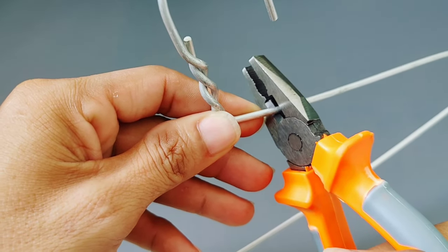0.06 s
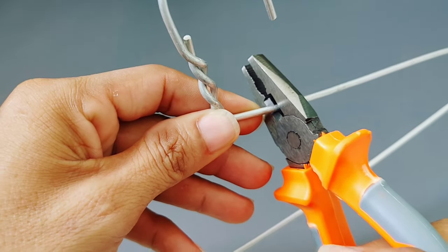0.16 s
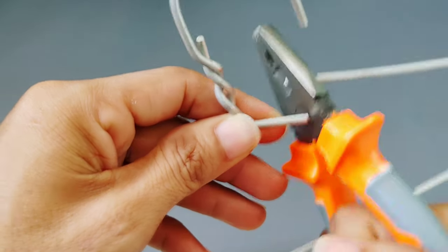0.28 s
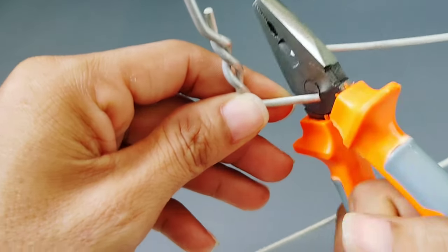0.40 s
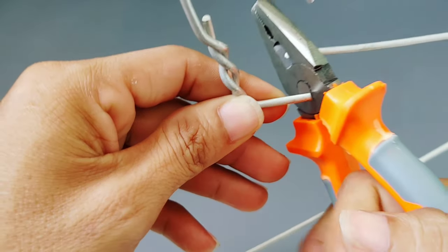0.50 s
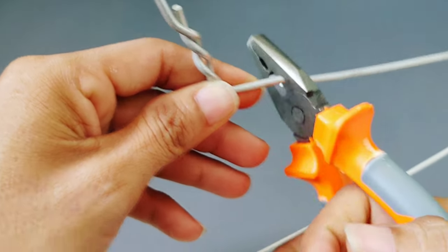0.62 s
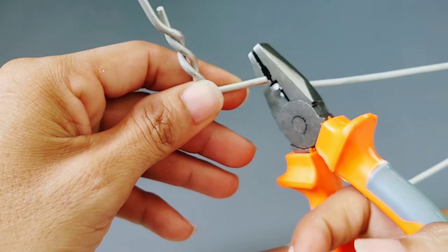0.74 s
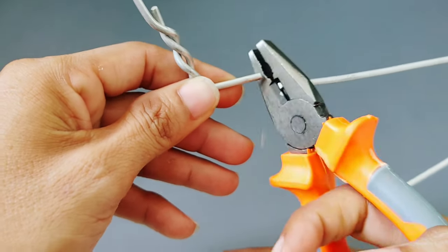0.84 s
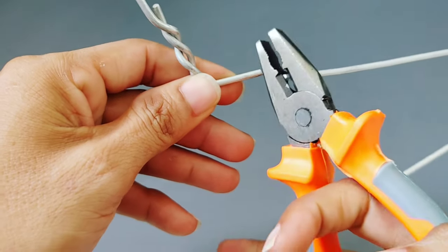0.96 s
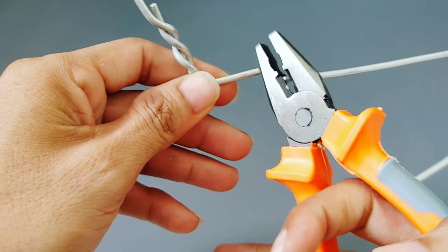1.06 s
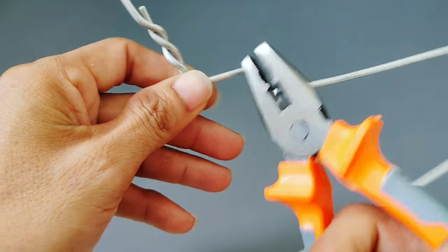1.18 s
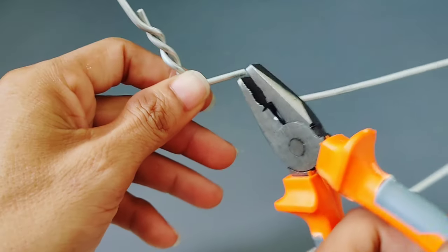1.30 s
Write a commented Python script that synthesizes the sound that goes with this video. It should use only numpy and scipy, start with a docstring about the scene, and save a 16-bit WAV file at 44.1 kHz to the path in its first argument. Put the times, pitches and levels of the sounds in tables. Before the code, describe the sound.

Steel pliers cut a wire with one loud, sharp snap and short metallic rattle, then faint hand rustle and scattered bright clicks and scrapes, heard very close in stereo in a quiet, hard indoor room.

```python
"""Steel pliers bite and snap through a wire close to a two-port microphone in a quiet, hard room.
The jaws clack and the steel rings as sums of decaying modes; the cut wire rattles as dense coloured grains.
A modal thump runs through the handles. Ticks are noise bursts with damped steel modes; the bite before
the snap and the scrapes after it are streams of tiny slips. Sparse random taps give the room's tail;
drifting noise gives its hush, and a faint coloured hiss the rustle of the hands."""
import sys
import numpy as np
from scipy import signal
from scipy.fft import rfft, irfft
from scipy.io import wavfile
from scipy.ndimage import uniform_filter1d

SR = 44100
rng = np.random.default_rng(int(sys.argv[2]) if len(sys.argv) > 2 else 0)


def volts(x):
    """Linear amplitude factor 10**(x/20) for a level x in dB, scalar or array-like."""
    e = np.asarray(x, float) / 20
    return 10 ** e


def generate_wav(sig):
    """Save sig (samples, or channels by samples) to the path in sys.argv[1] as 16-bit PCM at SR."""
    pcm = np.round(np.clip(np.atleast_2d(sig).T, -1, 1) * 32767).astype(np.int16)
    wavfile.write(sys.argv[1], SR, pcm)


N = 59535  # samples
SNAP_S = 0.2057
SLIPS_PER_S = 8100  # in each grain stream of the bite, scrapes and rustle

# Free vibration modes of pliers and wire: pitch_hz, relative_level_db, free_t60_s
STEEL_MODES = [(2293, -8, .25), (3560, -10, .25), (4032, -8, .22), (4830, -10, .15), (5270, -10, .15),
               (5701, -5, .25), (6030, -8, .2), (7058, -10, .18), (8804, -4, .13), (9636, -4, .12),
               (10523, -6, .13), (11080, -5, .13), (11572, 0, .2), (12280, -6, .18), (12990, -5, .13),
               (14070, -6, .12), (15300, -4, .11)]


def evened(x):
    """Normalization to unit root-mean-square level over both ports together."""
    return x / np.sqrt(np.mean(x ** 2) + 1e-20)


def read(points, hz):
    """Interpolation of a spectral curve along a logarithmic frequency axis."""
    f, value = np.transpose(points)
    return np.interp(np.log(hz + 1), np.log(f + 1), value)


def add(mix, start_s, sound):
    """Linear superposition of a sound onto the mix, cut at its end."""
    part = mix[:, round(start_s * SR):][:, :sound.shape[-1]]
    part += sound[..., :part.shape[1]]


def pan(left_minus_right_db):
    """Level difference between the ports, shared equally as gain and loss."""
    half_db = left_minus_right_db / 2
    return volts(np.array([[half_db], [-half_db]]))


def lean(centre_hz):
    """Interport level difference: brighter contacts favour the left port."""
    db_per_octave, balanced_hz = 4, 5200
    return pan(db_per_octave * np.log2(centre_hz / balanced_hz))


def coloured(x, gain_db):
    """Linear filtering in the spectrum by a gain in dB given as a function of Hz."""
    hz = np.fft.rfftfreq(x.shape[-1], 1 / SR) + 1
    return irfft(rfft(x) * volts(gain_db(hz)), x.shape[-1])


def bell(centre_hz, octaves):
    """Broad resonance, 6 dB down at the given octaves either side, above a weak wide skirt."""
    skirt_db, skirt_hz = -14.5, 1636.7  # level above this pitch; below it, 18 dB per octave down

    def gain_db(hz):
        hump = -6 * (np.log2(hz / centre_hz) / octaves) ** 2
        skirt = skirt_db + 18 * np.minimum(np.log2(hz / skirt_hz), 0)
        return np.maximum(hump, skirt)

    return gain_db


def ring(modes, gains_db, rise_s, spread_rad):
    """Modal superposition of decaying sines, out of step between the ports by up to spread_rad."""
    hz, db, t60_s = np.transpose(modes)[:, :, None]
    t = np.arange(SR // 2) / SR
    shift = spread_rad * rng.uniform(-.5, .5, hz.shape)
    rise = 1 - np.exp(-(t / rise_s) ** 2)
    shape = volts(db + gains_db - 60 * t / t60_s) * rise
    ports = [(shape * np.sin(2 * np.pi * hz * t + side * shift)).sum(0) for side in (1, -1)]
    return np.array(ports)


def grains(length_s, per_s):
    """Stick-slip friction as random impulses of uneven size, partly different at each port."""
    shape = (3, round(length_s * SR))
    slips = rng.standard_normal(shape) * (rng.random(shape) < per_s / SR)
    slips *= volts(3 * np.minimum(rng.exponential(1, shape), 2))  # 0 to 6 dB of extra size
    # The third stream reaches the two ports with opposite signs.
    return slips[:2] + np.array([[.3], [-.3]]) * slips[2]


def hush():
    """Partially coherent stationary noise: room tone and microphone hiss with faint drifting patches."""
    # Hush spectrum: pitch_hz, relative_density_db_per_hz
    hush_tone = [(15, -42.5), (25, -13.5), (140, -5.5), (400, -5), (750, -11), (1200, -18.5), (2500, -23.5),
                 (4500, -27), (7900, -38.5), (8800, -32.5), (9300, -19), (9900, -30.5), (11500, -31),
                 (13500, -30), (16000, -31.5)]
    # Coherence between the ports: pitch_hz, left_right_likeness
    likeness = [(60, 0.86), (130, 1), (290, 0.65), (640, 0.38), (1410, -0.16), (3100, -0.01), (6820, -0.11),
                (15000, -0.09)]
    # Interport level difference: pitch_hz, left_minus_right_db
    port_balance = [(60, -2), (240, 0), (950, 0.5), (3770, -3), (15000, 3.5)]
    level_db, patch_db = -61.5, 1.9  # patch_db is the rms drift of each time-frequency cell
    frames, hz = N // 256 + 5, np.fft.rfftfreq(1024, 1 / SR)
    a, b, c, d, patches = rng.standard_normal((frames, 513, 5)).T
    patches = uniform_filter1d(patches, size=12, axis=0)  # across frequency
    patches = evened(uniform_filter1d(patches, size=14, axis=1))  # across time
    same = np.clip(read(likeness, hz), -1, 1)[:, None]
    left, other = a + 1j * b, c + 1j * d
    z = np.array([left, same * left + np.sqrt(1 - same ** 2) * other])
    z *= volts(read(hush_tone, hz)[:, None] + patch_db * patches)
    z *= volts(np.array([.5, -.5])[:, None] * read(port_balance, hz))[:, :, None]
    noise = signal.istft(z, nperseg=1024, noverlap=768)[1][:, :N]
    return volts(level_db) * evened(noise)


def room(x):
    """Reverberation: convolution with sparse random-sign taps whose bands decay at their own speeds."""
    # Early decay of the room: pitch_hz, t60_s
    decay = [(150, 0.23), (500, 0.59), (1300, 0.21), (2300, 0.476), (3100, 0.5), (3900, 0.474),
             (7000, 0.385), (12000, .3)]
    knee_s, extra_drop_db_per_s = .2, 118.5  # after the knee the tail fades faster
    taps = np.zeros((2, SR))
    at = np.arange(160, SR - 20, 20) + rng.integers(0, 20, (2, (SR - 161) // 20))
    np.put_along_axis(taps, at, rng.choice([-1., 1.], at.shape), 1)
    hz, t, z = signal.stft(taps, SR, nperseg=256)
    fade_db = -60 * t / read(decay, hz)[:, None]
    fade_db = fade_db - extra_drop_db_per_s * np.maximum(t - knee_s, 0)
    tail = signal.istft(z * volts(fade_db), SR, nperseg=256)[1]
    return signal.fftconvolve(x, tail / np.linalg.norm(tail[0]), axes=1)[:, :N]


def rustle():
    """Amplitude-modulated friction noise: a faint wide hiss of skin and grips that comes and goes."""
    # Shifting of the hands: time_s, level_db (before the common trim)
    shifting = [(0.0, -85), (0.214, -72.5), (0.344, -64.5), (0.526, -66), (1.116, -73), (1.21, -71.5),
                (1.35, -88)]
    # Rustle colour: pitch_hz, relative_density_db_per_hz
    rustle_tone = [(300, -19.5), (1000, -4.5), (3000, 0), (6000, -6.5), (8000, -14), (10000, -5.5),
                   (13000, -3.5), (16000, -7)]
    trim_db = -1
    s, db = np.transpose(shifting)
    hiss = evened(coloured(grains(N / SR, SLIPS_PER_S), lambda hz: read(rustle_tone, hz)))
    return hiss * volts(trim_db + np.interp(np.arange(N) / SR, s, db))


def scrapes():
    """Stick-slip friction: dense slips under a swelling and fading stroke."""
    # Strokes of the jaws along the wire: start_s, length_s, level_db (before stroke shape and lean),
    # centre_hz, half_width_octaves
    strokes = [(0.723, .048, -50.5, 6977, 2.56), (.88, 0.057, -54.5, 11100, 1.04),
               (0.9, .034, -45, 9980, 1.524), (1.08, 0.043, -58.5, 7780, 1.4),
               (1.143, .03, -52, 5345, 0.546), (1.208, 0.059, -64.5, 7000, 1.04)]
    out = np.zeros((2, N))
    for start_s, length_s, db, centre_hz, octaves in strokes:
        rub = evened(coloured(grains(length_s, SLIPS_PER_S), bell(centre_hz, octaves)))
        stroke = np.sin(np.linspace(0, np.pi, rub.shape[1])) ** 0.36
        add(out, start_s, lean(centre_hz) * volts(db) * rub * stroke)
    return out


def ticks():
    """Impact excitation: short bright bursts with damped steel modes, and pings of one mode left free."""
    # Ticks of steel on wire: start_s, level_db (before envelope and lean), centre_hz, half_width_octaves
    contacts = [(.054, -57.5, 9000, 1.87), (.14, -65, 6120, 1.25), (.179, -42.5, 6000, 1.56),
                (.580, -50.5, 4000, 6), (.725, -44.5, 7940, 1.9), (.757, -42, 7050, 1.6),
                (.886, -46.5, 13000, 0.68), (.907, -34, 9100, 0.96), (0.9148, -28.5, 12050, 0.96),
                (1.036, -59, 3000, 1.476), (1.085, -41, 9100, 0.96), (1.107, -51, 5000, 1.027),
                (1.1493, -40.5, 5000, 0.58), (1.1565, -38, 5200, 0.64), (1.1636, -38.5, 5800, 0.86),
                (1.219, -44, 11100, 0.55), (1.2433, -38.5, 10240, 0.7)]
    # Pings of a single steel mode: start_s, level_db, pitch_hz, share_of_free_t60
    free_pings = [(.760, -55, 5701, .9), (.790, -67, 6030, .9), (.727, -55, 11572, .6)]
    burst_t60_s, rise_s = 0.015, 0.00066
    ring_db, grip = -13, 0.1557  # the hand shortens a tick's ring to this share of its free t60
    out = np.zeros((2, N))
    t = np.arange(2048) / SR
    mode_hz = np.transpose(STEEL_MODES)[0][:, None]
    held_modes = np.multiply(STEEL_MODES, [1, 1, grip])
    for start_s, db, centre_hz, octaves in contacts:
        colour = bell(centre_hz, octaves)
        burst = evened(coloured(rng.standard_normal((2, len(t))), colour))
        burst *= volts(db - 60 * t / burst_t60_s) * np.minimum(t / rise_s, 1)
        add(out, start_s, lean(centre_hz) * burst)
        steel = ring(held_modes, db + ring_db + colour(mode_hz), rise_s, 2 * np.pi)
        add(out, start_s, lean(centre_hz) * steel)
    for start_s, db, ping_hz, share in free_pings:
        level_modes = np.multiply(STEEL_MODES, [1, 0, share])
        chosen_db = np.where(mode_hz == ping_hz, db, -200)
        add(out, start_s, ring(level_modes, chosen_db, 0.00395, np.pi))
    return out


def bite():
    """Crushing noise: slips swell exponentially as the edges crush into the wire until it parts."""
    start_s, final_db, rise_db_per_s, centre_hz = .172, -41, 598.5, 3000
    crunch = evened(coloured(grains(SNAP_S - start_s, SLIPS_PER_S), bell(centre_hz, 1.5)))
    time_left = np.arange(crunch.shape[1])[::-1] / SR
    out = np.zeros((2, N))
    add(out, start_s, crunch * volts(final_db - rise_db_per_s * time_left))
    return out


def thump():
    """Low structural modes of the handles, strong at the right port and inverted at the left."""
    # Handle modes: pitch_hz, relative_level_db, t60_s
    handle_modes = [(190.56, 2, 0.04336), (249.84, 0, 0.041), (124.8, -17.5, .07), (520, -19, .1)]
    start_s, gain_db, left_gain = .2075, -10, -.2
    out = np.zeros((2, N))
    add(out, start_s, np.array([[left_gain], [1]]) * ring(handle_modes, gain_db, .003, 0))
    return out


def snap():
    """Impulsive release excites modes of jaws and steel, and the cut wire rattles in dense impacts."""
    # Clack of the jaws: pitch_hz, relative_level_db, t60_s
    jaw_modes = [(793, -21, 0.01925), (1555.6, -15, 0.0225), (2121.2, -15.5, 0.028),
                 (2327.8, -0.5, 0.01025), (2691.7, -12.5, 0.0234), (3559.8, -14.5, .02),
                 (4027.6, -20, 0.031), (5000, -20, .012), (6160, -20, .01)]
    # Rattle colour: pitch_hz, relative_density_db_per_hz
    rattle_tone = [(1760, -35.5), (3000, -16), (3940, -4), (4500, -10), (5840, -7.5), (9400, -8),
                   (10100, -11.5), (11400, -1.5), (16000, -13.5)]
    rattle_s, rattle_db, rise_s, rattle_t60_s = .2025, -18.5, 0.0098, .13
    out = np.zeros((2, N))
    add(out, SNAP_S, pan(-1.5) * ring(jaw_modes, 2.5, 0.001046, 2))
    add(out, SNAP_S, ring(STEEL_MODES, -29, 0.0053, 2 * np.pi))
    buzz = evened(coloured(grains(.25, 17000), lambda hz: read(rattle_tone, hz)))
    t = np.arange(buzz.shape[1]) / SR
    rise = np.minimum(t / rise_s, 1) ** 1.5
    decay = volts(rattle_db - 60 * np.maximum(t - rise_s, 0) / rattle_t60_s)
    add(out, rattle_s, pan(1.9) * buzz * rise * decay)
    return out


def scene():
    """Superposition of direct sound, reverberation and background."""
    cut, low, small = bite() + snap(), thump(), ticks() + scrapes()
    # The thump enters the room with its ports exchanged.
    sent = volts(-6.5) * cut + volts(-15) * low[::-1] + volts(-11) * small
    return cut + low + small + room(sent) + hush() + rustle()


def low_pass(x):
    """Removes everything above the highest recorded frequency."""
    return signal.sosfilt(signal.butter(12, 16630, fs=SR, output="sos"), x)


def record(dry):
    """Band limitation by a linear-phase low-pass at 15900 Hz, then the finished mix."""
    lowpass = signal.firwin(511, 15900, window=("kaiser", 9), fs=SR)
    mix = signal.oaconvolve(dry, lowpass[None], "same")
    return low_pass(mix)


dry = scene()
out = record(dry)
generate_wav(out)
```